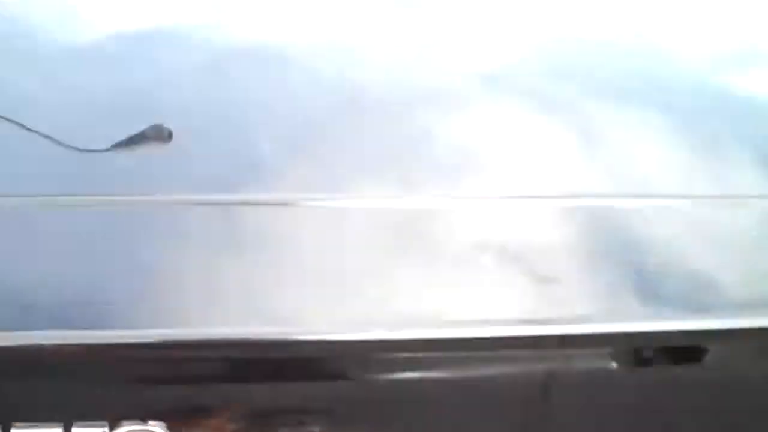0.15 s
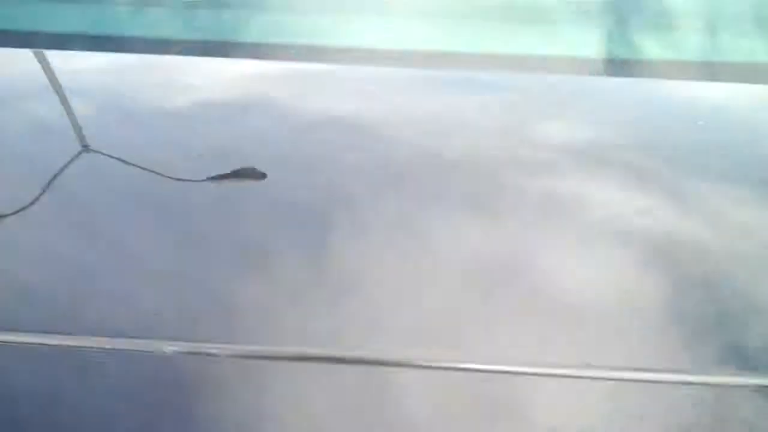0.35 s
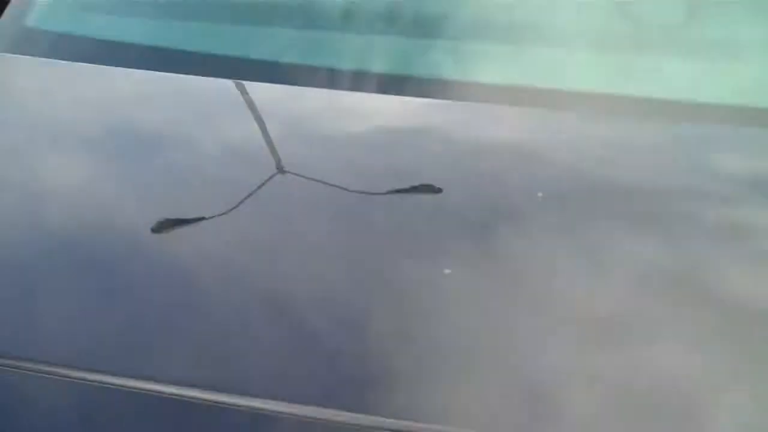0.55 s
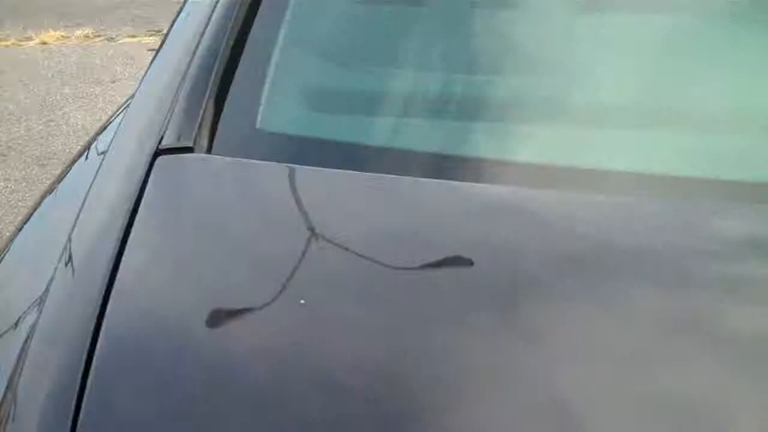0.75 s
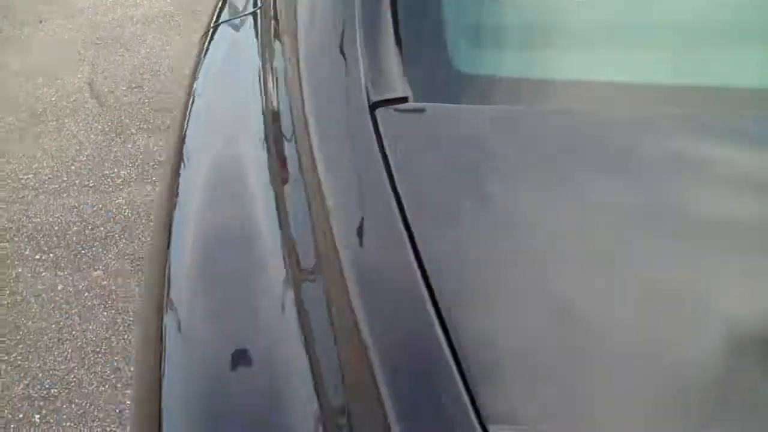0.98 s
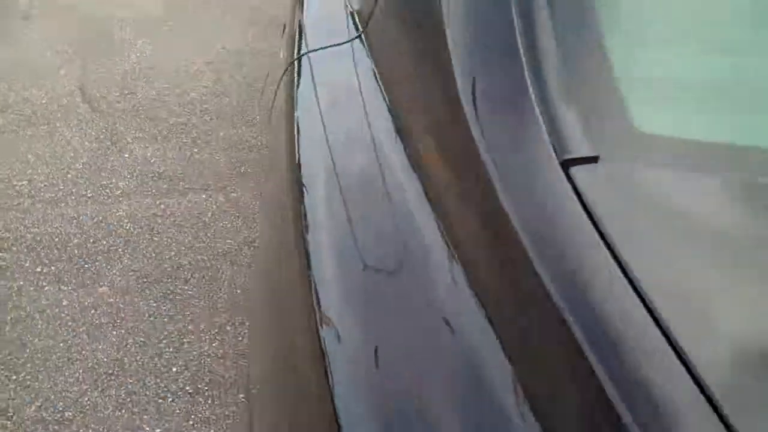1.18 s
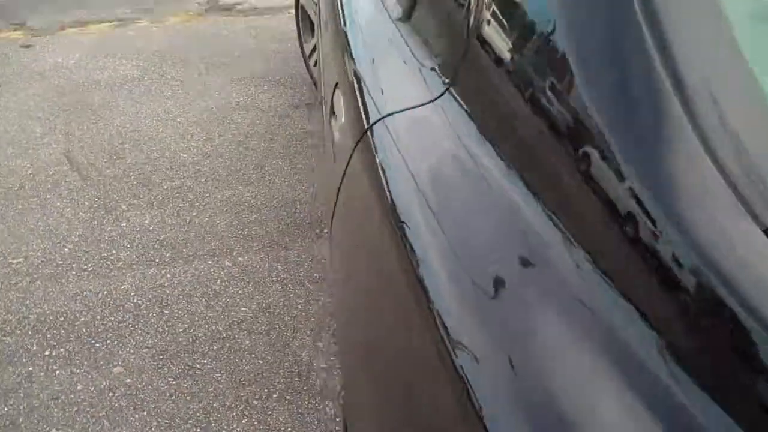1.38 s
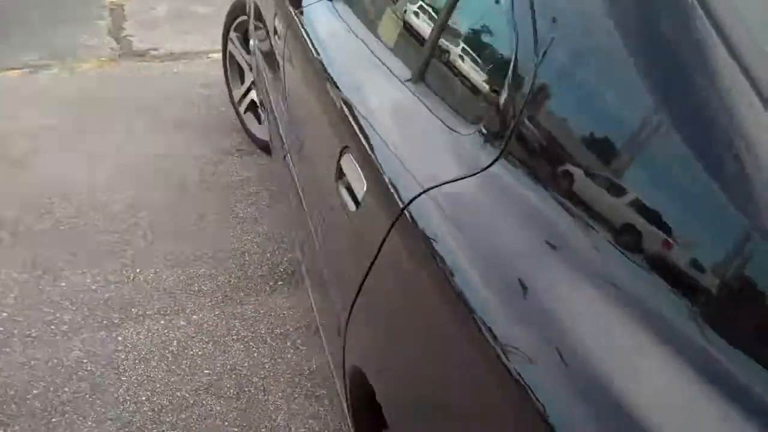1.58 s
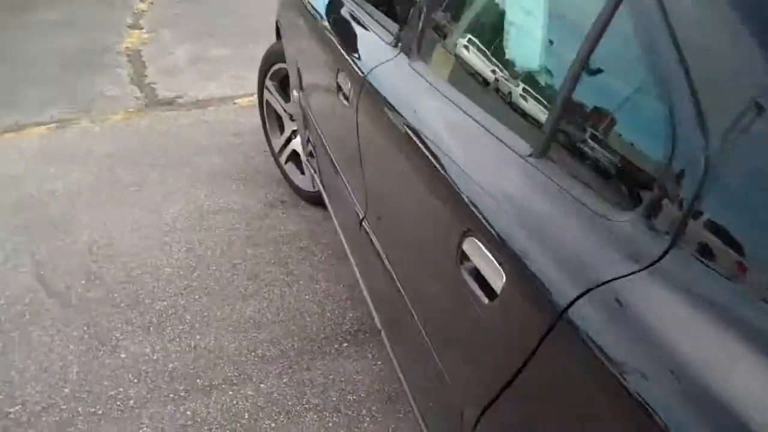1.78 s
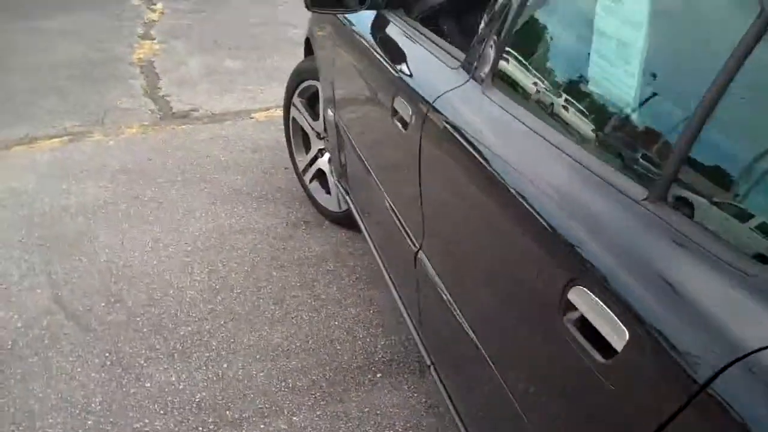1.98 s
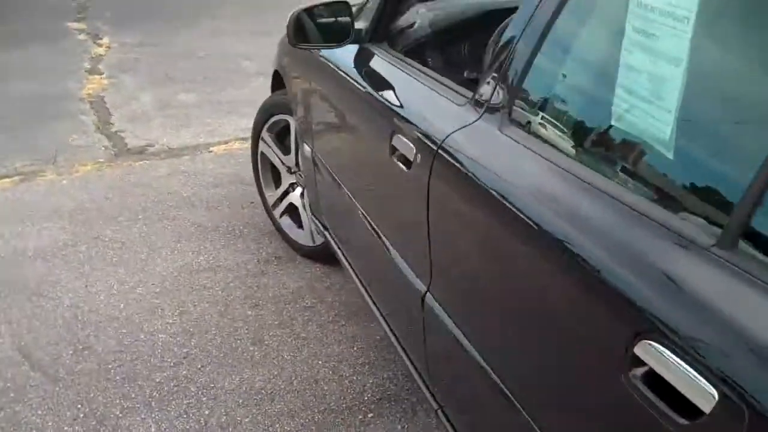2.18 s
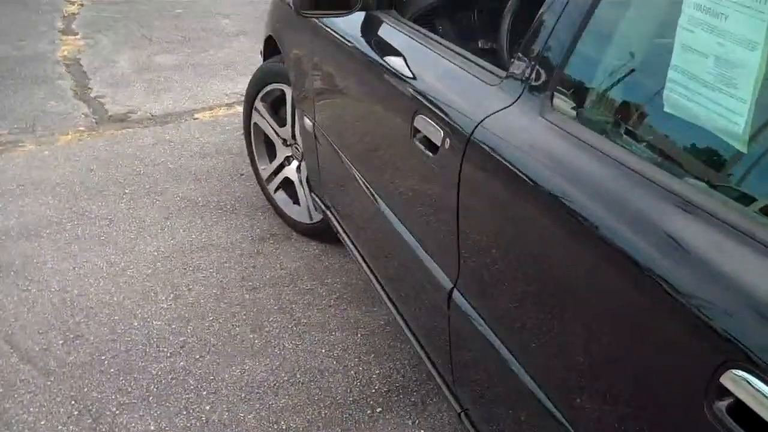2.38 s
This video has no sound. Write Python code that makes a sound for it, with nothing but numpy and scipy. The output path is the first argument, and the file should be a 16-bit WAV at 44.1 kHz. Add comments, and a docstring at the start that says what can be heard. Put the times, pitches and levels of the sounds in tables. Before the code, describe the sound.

One heavy, hard thump of a car trunk closing in a parking lot, then quiet background hiss

```python
"""A car's trunk lid is slammed close by in a parking lot, heard by two microphone ports.
Filtered noise makes distant traffic, hiss and insects; sines make an idling engine; air swells under the falling lid.
After two ticks the lid meets its seal and the latch snaps home: decaying modes and noise ring, and the trunk air booms.
Overload clips the peaks; gain control ducks everything and the background swells back as a low hum dies away.
Gliding sines make faint bird whistles and a buzzing note; a dull noise burst makes a step, and a last tick follows."""
import sys
import numpy as np
from scipy import signal
from scipy.fft import rfft, irfft
from scipy.io import wavfile
from scipy.ndimage import uniform_filter1d

SR = 44100
rng = np.random.default_rng(int(sys.argv[2]) if len(sys.argv) > 2 else 0)


def unload_wav(signal):
    """Save mono or channel-first audio to the path in sys.argv[1] as 16-bit WAV at rate SR, clipped to [-1, 1]."""
    wavfile.write(
        sys.argv[1],
        SR,
        np.round(np.clip(np.atleast_2d(signal).T, -1, 1) * 32767).astype(np.int16),
    )


N = 108045
TIME = np.arange(N) / SR  # seconds
SLAM_SIZE = 2 ** 15  # samples

# Contacts of the lid. Each row: time in seconds, relative push on the panels in dB,
# relative clatter of the latch in dB.
BLOWS = [(0.194, -46, -31), (0.198, -21.5, -17), (.2055, 6.5, -14), (0.2087, 7.5, 5.5), (.2145, -7.5, 0),
         (0.2221, 2, -18), (.237, -11.5, -19.5), (0.268, -28, -15.5), (0.298, -42, -21.5),
         (.34, -28.5, -32), (0.377, -29, -48)]
SHUT_S = max(BLOWS, key=lambda row: row[2])[0]  # the contact with the loudest latch
# Likeness of near sounds at the two ports. Each row: frequency in Hz, correlation from 0 to 1.
NEAR_SAME = [(60, .94), (150, .88), (300, .96), (700, .96), (1300, .86), (2300, .8), (5000, .45),
             (12000, .3)]
# Balance of near sounds. Each row: frequency in Hz, left minus right in dB.
NEAR_SIDE = [(60, -2), (300, -.7), (1300, -1.8), (4200, 0), (7600, 6), (14000, 9)]
# Likeness of far sounds at the two ports. Each row: frequency in Hz, correlation from 0 to 1.
FAR_SAME = [(50, .92), (300, .9), (1000, .82), (2500, .6), (6000, .3), (12000, .1)]
# Balance of far sounds. Each row: frequency in Hz, left minus right in dB.
FAR_SIDE = [(40, -3), (200, -1.5), (1200, -1.5), (4000, 0), (12000, 1)]


def amp(db):
    """Decibels are logarithmic: 20 dB is a tenfold amplitude."""
    return np.exp(np.asarray(db) * (np.log(10) / 20))


def unit(x):
    """Mean power sets the level: scales to rms 1."""
    return x / np.sqrt(np.mean(x ** 2) + 1e-20)


def read(points, hz):
    """Pitch is logarithmic in frequency: interpolates a table on a log-frequency axis."""
    f, value = np.transpose(points)
    return np.interp(np.log(hz + 1), np.log(np.sort(f) + 1), value)


def level(points):
    """Loudness follows decibels: interpolates levels in dB over time and returns the gain."""
    return amp(np.interp(TIME, *np.transpose(points)))


def wander(rate_hz, size=N):
    """Low-passed noise of rms 1: random fluctuation mostly slower than rate_hz."""
    hz = np.fft.rfftfreq(size, 1 / SR)
    phases = np.exp(2j * np.pi * rng.random(len(hz)))
    return unit(irfft(phases / (1 + (hz / rate_hz) ** 4), size))


def noise(spectrum, same, side, size=N):
    """Partial coherence: stereo noise of rms 1 whose ports share part of each frequency."""
    hz = np.fft.rfftfreq(size, 1 / SR)
    common, separate = np.exp(2j * np.pi * rng.random((2, len(hz))))
    likeness = np.clip(read(same, hz), -1, 1)
    lean = amp(read(side, hz) / 2)
    left = common * lean
    right = (likeness * common + np.sqrt(1 - likeness ** 2) * separate) / lean
    return unit(irfft(np.array([left, right]) * amp(read(spectrum, hz)), size))


def placed(x, side_db):
    """Intensity panning: mono to stereo, with left louder by side_db."""
    return x * amp([[side_db / 2], [-side_db / 2]])


def lagged(x, lag_s):
    """Arrival-time difference: a linear phase delays the left port by lag_s."""
    hz = np.fft.rfftfreq(N, 1 / SR)
    delay = np.exp(-2j * np.pi * hz * np.array([[lag_s], [0]]))
    return irfft(rfft(x) * delay, N)


def add(mix, s, sound):
    """Superposition: sums a sound into the mix from s seconds on."""
    part = mix[:, round(s * SR):][:, :sound.shape[-1]]
    part += sound[..., :part.shape[-1]]


def strike(t, rise, t60):
    """Damped resonance: linear rise and exponential decay by 60 dB per t60, t seconds after a hit."""
    t = np.clip(t, 0, 2 * t60)
    return np.minimum(t / rise, 1) * np.exp(-np.log(1000) * t / t60)


def build_up(hits, rise, t60):
    """Energy addition: the powers left by successive hits on a resonance sum."""
    t = TIME[:SLAM_SIZE:8]  # coarse steps suffice for an envelope
    power = sum((amp(db) * strike(t - s, rise, t60)) ** 2 for s, db in hits)
    return np.interp(TIME[:SLAM_SIZE], t, np.sqrt(power))


def dense_ring(spectrum, t60s, hits, rise, count=6):
    """High modal density: closely packed modes act as noise whose bands decay separately."""
    z = rfft(noise(spectrum, NEAR_SAME, NEAR_SIDE, size=SLAM_SIZE))
    pitch = np.log(np.fft.rfftfreq(SLAM_SIZE, 1 / SR) + 1)
    centres = np.geomspace(100, 12000, count)
    out = 0
    for centre, share in zip(centres, np.eye(count)):
        # overlapping triangular bands that add up to the whole spectrum
        band = irfft(z * np.interp(pitch, np.log(centres), share))
        out = out + band * build_up(hits, rise, read(t60s, centre))
    return out


def traffic():
    """Many incoherent far sources merge into broadband noise."""
    # Colour of the wash. Each row: frequency in Hz, relative density in dB per Hz.
    wash_colour = [(20, -6), (50, -5), (95, 0.17), (160, -6), (270, -5), (400, -12), (900, -11.5),
                   (1400, -16), (2100, -26), (4000, -42), (10000, -62)]
    # Course of the wash. Each row: time in seconds, level in dB.
    wash_level = [(0, -41), (.6, -45), (1.2, -41.5), (1.8, -41), (2.45, -41.5)]
    flutter_db = 0.13 * wander(rate_hz=8)
    return noise(wash_colour, FAR_SAME, FAR_SIDE) * level(wash_level) * amp(flutter_db)


def idling_engine():
    """Periodic firing gives steady partials, all wavering with the engine's speed."""
    # Partials. Each row: frequency in Hz, rms level in dB before panning.
    partials = [(31, -40.5), (93, -53), (500.6, -58.5)]
    clock = np.cumsum(1 + 0.01222 * wander(rate_hz=3.74)) / SR  # seconds, at uneven speed
    idle = 0
    for hz, db in partials:
        idle = idle + amp(db) * np.sqrt(2) * np.sin(2 * np.pi * (hz * clock + rng.random()))
    return placed(idle, side_db=-4.5)


def hiss():
    """Random pressure fluctuation: faint high-pitched noise of the open air."""
    # Colour of the hiss. Each row: frequency in Hz, relative density in dB per Hz.
    hiss_colour = [(1200, -15), (2300, 0), (3200, 0), (4500, -3), (6500, -4), (10500, -17), (14000, -17)]
    # Course of the hiss. Each row: time in seconds, level in dB.
    hiss_level = [(0, -55.5), (.6, -62.5), (1.0, -58.5), (1.25, -57.5), (1.6, -59), (2.45, -53.5)]
    return noise(hiss_colour, FAR_SAME, FAR_SIDE) * level(hiss_level)


def insects():
    """Many unsynchronized callers merge into a narrow band of noise with a slight flutter."""
    # Colour of the chorus. Each row: frequency in Hz, relative density in dB per Hz.
    chorus_colour = [(4800, -28), (6000, -15.5), (6400, -2), (7000, -5.5), (7600, 0), (7950, -5),
                     (8300, -20), (9500, -33), (11500, -94.5)]
    # Balance of the chorus. Each row: frequency in Hz, left minus right in dB.
    chorus_side = [(6500, -2), (7100, 4), (7700, 10), (9000, 16)]
    # Course of the chorus. Each row: time in seconds, level in dB.
    chorus_level = [(0, -45), (.7, -52.5), (1.2, -47), (1.8, -50), (2.45, -49)]
    chorus = noise(chorus_colour, [(7000, 0.15)], chorus_side)  # likeness 0.15 at all pitches
    flutter_db = 1.15 * wander(rate_hz=210)
    return chorus * level(chorus_level) * amp(flutter_db)


def rush():
    """Displacement flow: air pushed ahead of the falling lid swells as noise until it shuts."""
    # Colour of the rush. Each row: frequency in Hz, relative density in dB per Hz.
    rush_colour = [(50, -11), (150, -12), (280, 0), (450, -23), (1500, -24.5), (8000, -58.5)]
    swell_s = 0.2  # time to grow e-fold
    t = TIME[:SLAM_SIZE] - SHUT_S
    swell = np.exp(-abs(t) / swell_s) * (t < 0)
    return amp(-41) * swell * noise(rush_colour, NEAR_SAME, NEAR_SIDE, size=SLAM_SIZE)


def ticks():
    """Short impulses of small parts: rapidly damped noise around one centre frequency."""
    # Mechanical ticks. Each row: start in seconds, level in dB before the decay, centre in Hz.
    tick_rows = [(0.1566, -29, 6850), (0.1595, -29, 6540), (.175, -45, 11000), (0.2022, -24.5, 6870),
                 (1.9201, -36, 4030)]
    size = 2 ** 11
    shape = strike(TIME[:size], rise=.0004, t60=.012)
    out = np.zeros((2, N))
    for s, db, hz in tick_rows:
        # a bell in half-octave steps: -3 dB, -12 dB, -27 dB .. away from the centre
        colour = [(hz * 2 ** (k * .5), -3 * k * k) for k in np.arange(-4, 5)]
        add(out, s, amp(db) * shape * noise(colour, NEAR_SAME, NEAR_SIDE, size=size))
    return out


def lid_modes():
    """Modal vibration: each contact excites the lid's separate damped sine modes."""
    # Modes of the lid. Each row: frequency in Hz, relative level in dB, t60 in seconds.
    mode_rows = [(195, -7, .36), (236, -2, .32), (280, -1, .32), (395, -2, .28), (450, -4, .26),
                 (596, -5, .24), (643, -1, .21), (668, 0, .22), (741, 0, .2), (874, -2, .19), (914, 0, .19),
                 (1141, -7, .2), (1534, -7, .19), (1964, -7, .17)]
    t = TIME[:SLAM_SIZE]
    pushes = [(s, push_db) for s, push_db, _ in BLOWS]
    modes = 0
    for hz, db, t60 in mode_rows:
        ring = np.sin(2 * np.pi * (hz * t + rng.random()))
        modes = modes + amp(db) * build_up(pushes, .004, t60) * ring
    return placed(amp(-19) * modes, side_db=0.0)


def body_panels():
    """Statistical vibration: the pushes feed the panels' countless overlapping modes."""
    # Colour of the panels. Each row: frequency in Hz, relative density in dB per Hz.
    panel_colour = [(40, -2.5), (110, -11.5), (160, 2.5), (270, 3), (520, -9), (700, -6), (900, -3),
                    (1050, -9.5), (2000, -16), (4000, -41)]
    # Decay of the panels. Each row: frequency in Hz, t60 in seconds.
    panel_t60 = [(80, .3), (250, .32), (700, .23), (2500, .2)]
    pushes = [(s, push_db) for s, push_db, _ in BLOWS]
    return amp(-14.5) * dense_ring(panel_colour, panel_t60, pushes, rise=.002)


def latch():
    """Repeated small impacts of latch and trim: bright damped noise with a grainy level."""
    # Colour of the clatter. Each row: frequency in Hz, relative density in dB per Hz.
    latch_colour = [(300, -0.5), (1200, -2.5), (2000, -4.5), (3300, -4.5), (4400, -10), (5800, -5.5),
                    (7800, -4.5), (9000, -14.5), (11500, -20), (13300, -15.5), (15000, -22.5)]
    # Decay of the clatter. Each row: frequency in Hz, t60 in seconds.
    latch_t60 = [(1000, .165), (4000, .155), (12000, .14)]
    clatters = [(s, clatter_db) for s, _, clatter_db in BLOWS]
    grain_db = 2 * wander(rate_hz=1400, size=SLAM_SIZE)
    return amp(-6) * dense_ring(latch_colour, latch_t60, clatters, rise=0.0011) * amp(grain_db)


def boom():
    """Cavity resonance: the closing lid pumps the air in the trunk and rocks the body."""
    # Low resonances. Each row: start in seconds, frequency in Hz, level in dB before decay
    # and panning, rise in seconds, t60 in seconds.
    boom_rows = [(.2035, 88, 2, .008, .075), (.207, 28, -17, .01, .15), (.222, 57, -14, .02, .28),
                 (.225, 100, -18, .008, .27)]
    out = 0
    for s, hz, db, rise, t60 in boom_rows:
        t = TIME[:SLAM_SIZE] - s
        out = out - amp(db) * strike(t, rise, t60) * np.sin(2 * np.pi * hz * t)
    return placed(out, side_db=-3.0)


def linger():
    """Light damping: once the lid is shut, a low hum dies slowly in the car's body."""
    # Colour of the hum. Each row: frequency in Hz, relative density in dB per Hz.
    hum_colour = [(50, -20), (130, -13), (200, 0), (300, 0), (390, -17), (1000, -35), (6000, -70)]
    fade = strike(TIME - SHUT_S, rise=.03, t60=2.46)
    return amp(-36) * fade * noise(hum_colour, FAR_SAME, NEAR_SIDE)


def note(length, size=8192):
    """Amplitude envelope: progress from 0 to 1 through a bird's note and its arched loudness."""
    u = np.minimum(TIME[:size] / length, 1)
    return u, 1 - (2 * u - 1) ** 2


def whistles():
    """Near-sinusoidal voicing: each faint bird note is one gliding, wavering sine."""
    # Whistled notes. Each row: start in seconds, length in seconds, first and last pitch in Hz,
    # level in dB before arch and panning.
    whistle_rows = [(0.492, 0.042, 2500, 2430, -58.5), (1.95, 0.069, 3170, 3150, -61.5),
                    (2.142, 0.044, 3770, 3630, -63), (2.231, 0.07, 4160, 4120, -64),
                    (2.317, 0.092, 4120, 4470, -59), (2.392, 0.048, 2940, 2990, -54)]
    out = np.zeros((2, N))
    for start, length, from_hz, to_hz, db in whistle_rows:
        u, arch = note(length)
        glide_hz = from_hz + (to_hz - from_hz) * u
        hz = glide_hz * (1 + .016 * wander(rate_hz=148, size=len(u)))
        tone = np.sqrt(2) * np.sin(2 * np.pi * np.cumsum(hz) / SR)
        add(out, start, placed(amp(db) * arch * tone, side_db=-10))
    return out


def buzzing_bird():
    """Frequency modulation: quick upward sweeps on a sinking pitch fuse into a buzz."""
    from_hz, to_hz, sweep_hz = 6600, 6050, 1800
    sweeps_per_s = 154
    u, arch = note(length=.142)
    sweep_rate = sweeps_per_s * (1 + .03 * wander(rate_hz=80, size=len(u)))
    cycle = np.cumsum(sweep_rate) / SR % 1
    rough_hz = 130 * wander(rate_hz=730, size=len(u))
    hz = from_hz + (to_hz - from_hz) * u + sweep_hz * (cycle - .5) + rough_hz
    pulse = 2 * np.sin(np.pi * cycle) ** 2  # silent where the pitch jumps back
    buzz = amp(-43) * arch * pulse * np.sin(2 * np.pi * np.cumsum(hz) / SR)
    out = np.zeros((2, N))
    add(out, 1.125, placed(buzz, side_db=9.0))
    return out


def step():
    """Soft impact: a footfall on asphalt excites chiefly low, quickly damped noise."""
    # Colour of the step. Each row: frequency in Hz, relative density in dB per Hz.
    step_colour = [(30, -16), (80, -3), (160, 0), (240, -2), (330, -14), (1500, -38), (8000, -70)]
    thud = strike(TIME[:SLAM_SIZE], rise=.02, t60=.28)
    return amp(-29) * thud * noise(step_colour, NEAR_SAME, NEAR_SIDE, size=SLAM_SIZE)


def scene():
    """Linear superposition: the far background, the slam, the birds and the step add up."""
    mix = lagged(traffic() + idling_engine(), lag_s=.00008)
    mix += hiss() + insects() + ticks() + linger() + whistles() + buzzing_bird()
    add(mix, 0, rush() + lid_modes() + body_panels() + latch() + boom())
    add(mix, 1.07, step())
    return mix


def record(dry):
    """Dynamic compression that reacts too late for the slam, then overload and a band limit."""
    threshold_db, duck_share = -15.5, 0.38  # dB of gain lost per dB above the threshold
    recover_db_per_s, smoothing_s = 20, 0.024  # fall of the held level; lag of the gain
    power_db = 10 * np.log10(abs(uniform_filter1d((dry ** 2).mean(0), size=256)) + 1e-12)
    # the held level jumps up with each peak and falls at a constant rate
    fall = TIME * recover_db_per_s
    held_db = np.maximum.accumulate(power_db + fall) - fall
    over_db = np.maximum(held_db - threshold_db, 0)
    r = np.exp(-1 / (smoothing_s * SR))
    ducked = dry * amp(-duck_share * signal.lfilter([1 - r], [1, -r], over_db))
    clipped = np.clip(ducked, -.95, .95)
    low_pass = signal.firwin(255, 14300, window=("kaiser", 8), fs=SR)  # edge in Hz
    return signal.oaconvolve(clipped, low_pass[None], "same")


dry = scene()
out = record(dry)
unload_wav(out)
```